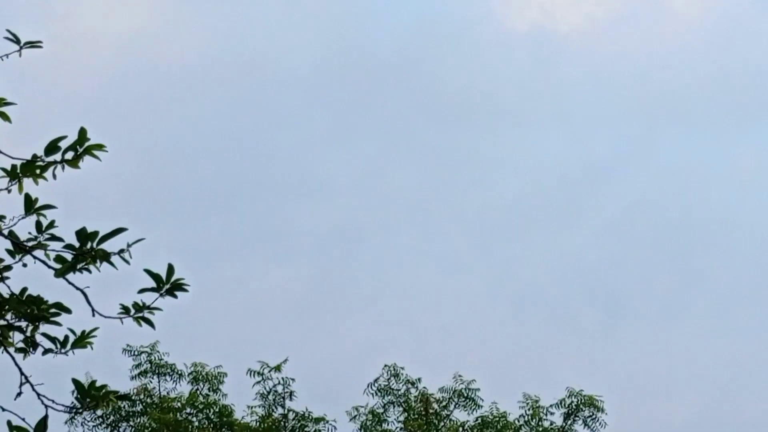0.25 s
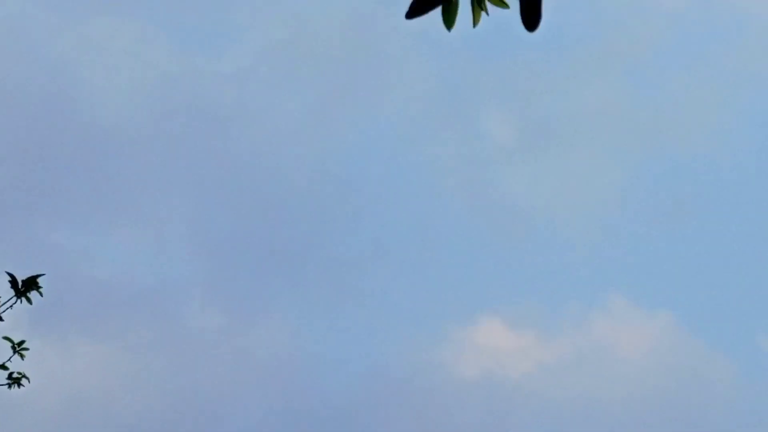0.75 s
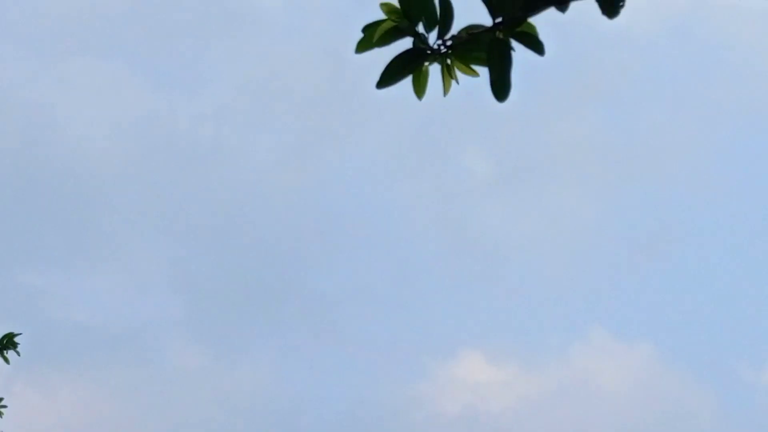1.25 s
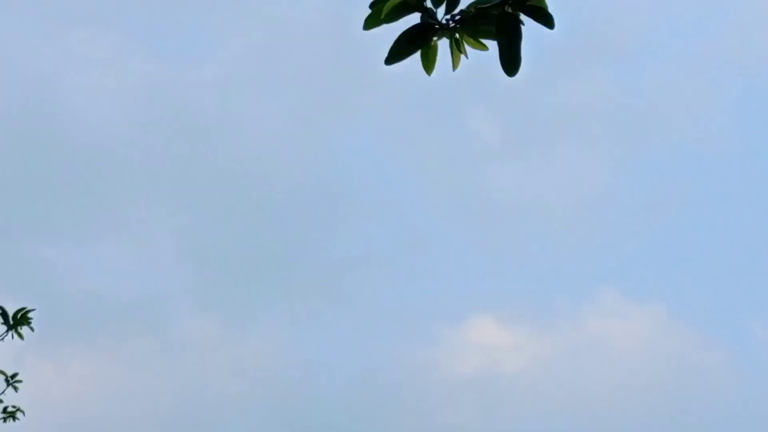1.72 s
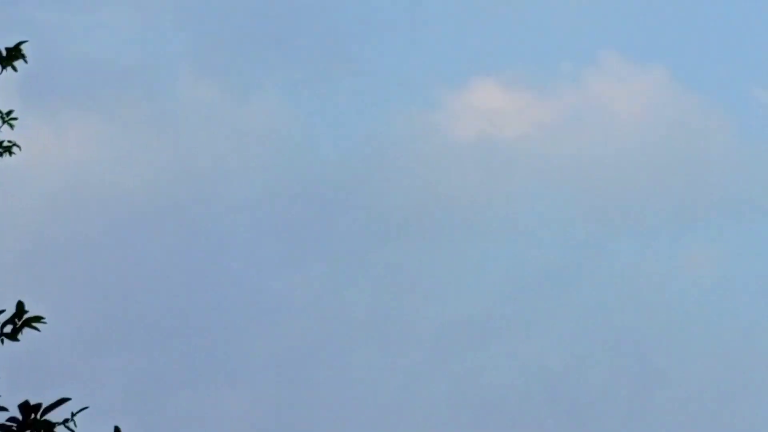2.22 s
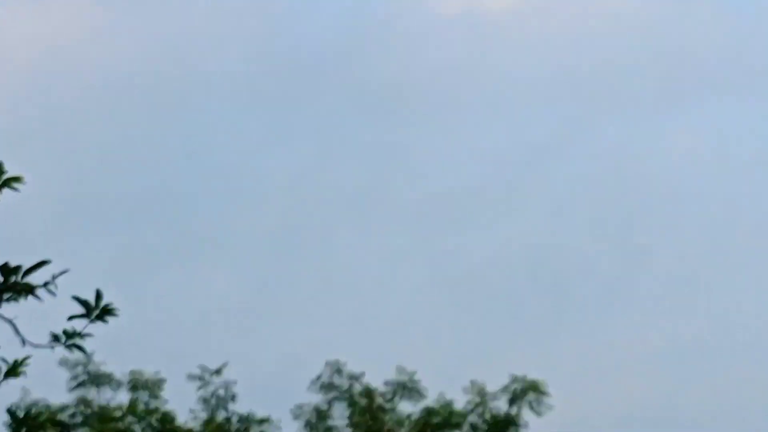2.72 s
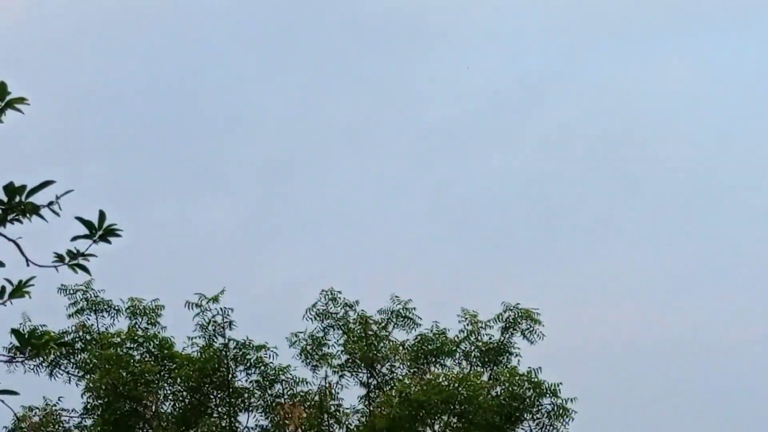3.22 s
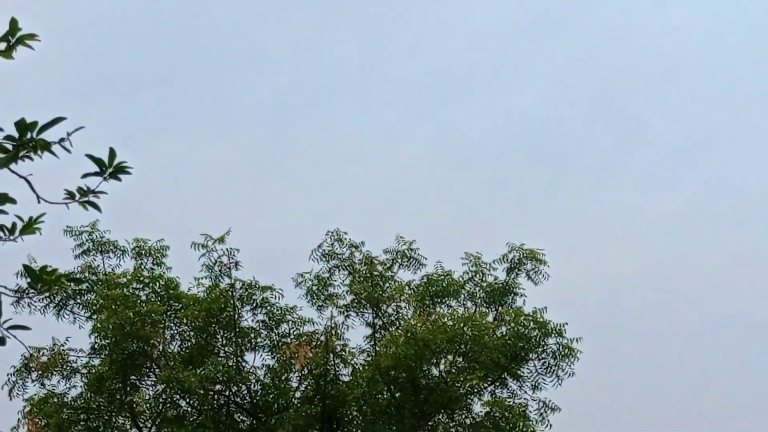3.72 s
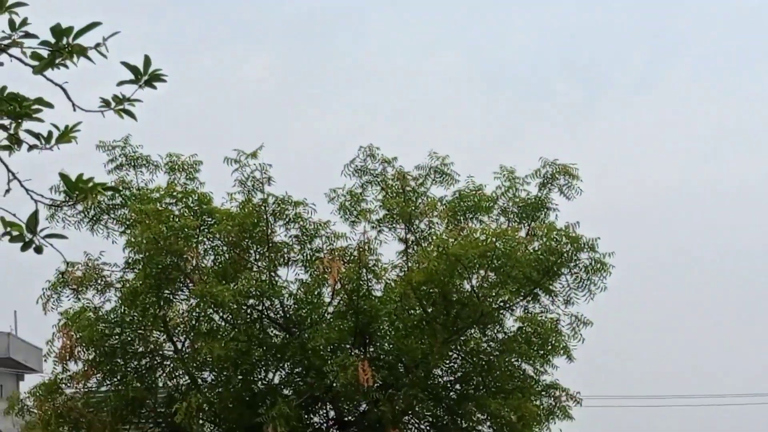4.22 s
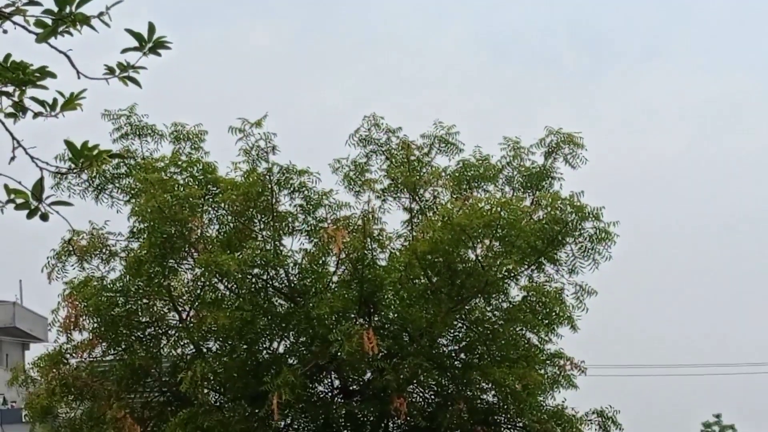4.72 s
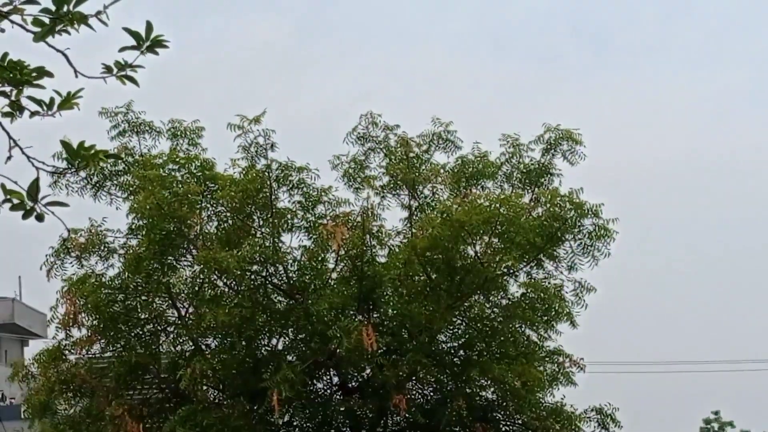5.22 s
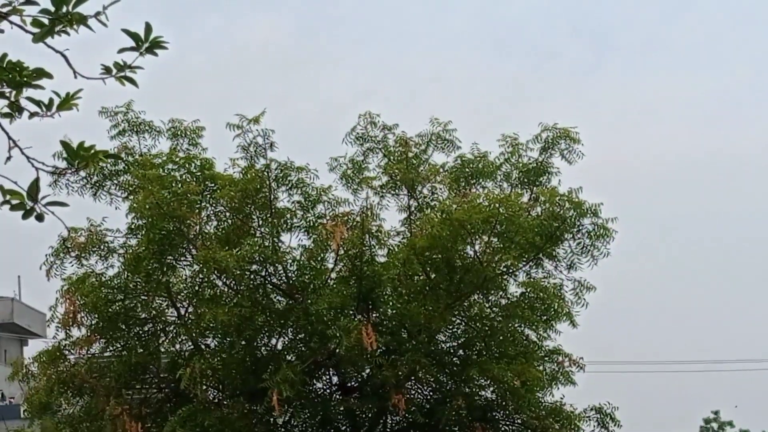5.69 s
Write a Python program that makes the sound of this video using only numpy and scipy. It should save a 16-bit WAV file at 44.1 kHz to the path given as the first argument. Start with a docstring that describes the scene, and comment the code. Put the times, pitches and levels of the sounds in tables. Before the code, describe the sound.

A koel gives four loud slurred rising whistles, each higher than the last, echoing among garden trees over faint town hum and distant birds.

```python
"""A koel in a garden tree gives four slurred whistles of one shape, each pitched higher than the last:
tones with weak overtones, a rasp near each crest (deepest in the third), a bright hiss after it, and
echoes off walls and trees. Throughout: noise-made town and air, two thin whines, far birds as sine slurs.
A dull bump early and one near the second call; a far engine surges once after it, then fades as a low
hum joins; soft noise rustles come before the third and fourth calls, with a small bird's trill before the last."""
import sys
import numpy as np
from scipy import signal
from scipy.fft import rfft, irfft, next_fast_len
from scipy.io import wavfile
from scipy.ndimage import uniform_filter1d, map_coordinates

SR = 44100
rng = np.random.default_rng(int(sys.argv[2]) if len(sys.argv) > 2 else 0)


def pcm_store(signal):
    """Save signal as 16-bit PCM."""
    levels = np.round(np.clip(np.atleast_2d(signal), -1, 1) * 32767)
    wavfile.write(sys.argv[1], SR, levels.astype(np.int16).T)


N = 262395
TIME = np.arange(N) / SR

# koel's calls, before the throat: start t/s, crest t/s, end t/s, base f/Hz, crest f/Hz,
# base level/dB, crest level/dB, overtones level/dB (before slope and effort)
WHISTLES = [(-.07, .334, .5, 1240, 1562, -46.5, -31.3, -10.5),
            (1.68, 2.04, 2.2, 1347, 1676, -38, -25, -10.5),
            (3.223, 3.573, 3.718, 1401, 1716, -36, -24, -8.5),
            (4.775, 5.076, 5.21, 1533, 1756, -29.5, -24.3, -9)]
# slower second vibration in each call: start t/s, end t/s, depth level/dB, rate/share of pitch
RASP = [(.26, .32, -28, .245), (1.955, 2.02, -24, .24), (3.425, 3.63, -16.5, .25), (4.915, 5.03, -22, .236)]
# response of throat and beak: f/Hz, level/dB
THROAT = [(800, -9.5), (1230, 5), (1780, -3), (2150, -3.5), (2600, -0.5), (3000, -17), (3450, -18.5),
          (3900, -30.5), (4350, -11.5), (5250, 3), (5550, -1), (6100, -8), (9500, -6), (12500, -26),
          (15300, -13.5)]
# hiss after each crest: f/Hz, relative density level/dB
HISS_COLOUR = [(3500, -30.5), (5000, -2.5), (6500, 4), (8300, -5.0), (10300, -3), (12000, -28.5),
               (15000, -31.5)]
# wall echoes, before the treble loss: delay t/s, level/dB
WALLS = [(0.013, -15), (0.028, -17.5), (0.046, -19.5), (0.066, -16), (.118, -35.5), (.18, -21.5)]
# decay of the trees' tail: f/Hz, t60/s
GARDEN_DECAY = [(300, 0.58), (1600, 1.67), (3000, 2.04), (5200, 1.32), (9000, .6), (15000, .2)]
# colour of that tail, relative: f/Hz, level/dB
GARDEN_COLOUR = [(500, 1.5), (1600, -2), (5000, -0.5), (9000, -0.5), (15000, -28)]
# small bird: t/s, level/dB, nominal f/Hz
TWITTERS = [(4.444, -51, 5750), (4.508, -64, 5750)]
# twitter contour: t/share of length, f/share of nominal
TWITTER_CONTOUR = [(0, 1.03), (.3, 1.02), (.62, .92), (.74, 1.15), (1, 1.14)]
# soft rustles: t/s, level/dB, fade t60/s
RUSTLES = [(3.041, -60.5, 0.38), (4.46, -53, 0.29), (4.509, -57, 0.83), (4.65, -71.5, 1)]
# noise spectrum of the rustles: f/Hz, relative density level/dB
RUSTLE_COLOUR = [(60, -12), (160, 9.5), (280, -21.5), (550, 1), (900, -4.5), (1800, 0), (2700, -5),
                 (4500, -29.5), (8000, -47.5)]
# dull bumps: t/s, level/dB, f/Hz
BUMPS = [(0.821, -67, 284), (2.16, -65.5, 271)]
# far birds' plain slurs: t/s, length/s, start f/Hz, end f/Hz, level/dB
SLURS = [(.9, .55, 3070, 2950, -81), (2.28, .31, 3100, 2970, -78.5), (2.582, 0.25, 2900, 2560, -76),
         (4.66, 0.1, 4060, 4150, -79), (5.71, .066, 6740, 5430, -73)]
# noise spectra of the town and the open air: f/Hz, relative density level/dB
RUMBLE_COLOUR = [(25, -46), (50, -17), (95, 6), (125, -2.5), (160, -3), (220, -8), (320, -7), (500, -15),
                 (900, -60.5)]
HUM_COLOUR = [(100, -22), (150, 1), (215, -11), (400, -22), (700, -50)]
MURMUR_COLOUR = [(200, -13), (330, -4.5), (460, -0.5), (580, 1), (750, -4), (1200, -8), (2000, -13.5),
                 (4000, -39)]
ENGINE_COLOUR = [(380, -25), (520, -1.5), (590, 3), (670, -6), (850, -17.5), (1300, -42.5)]
AIR_COLOUR = [(500, -8), (1300, 3.5), (2200, 0), (3100, -9), (3800, -8.5), (5000, -8), (6600, -15.5),
              (7600, -23), (10000, -35), (15000, -33)]

# whistle shape
SCOOP_SHARE, SCOOP_S = .36, .0085  # starts this share below its pitch, rises this quickly
OVERSHOOT_HZ, SETTLE_S = 330, .035  # before the scoop
CLIMB_LATE = 1.88  # exponent: higher = later climb
DROP_HZ_PER_S, CREST_ROUND_S = 5680, .045  # steady fall after a rounded crest
PLUNGE_HZ, PLUNGE_S = 243, .009  # extra fall as the air runs out
LOUD_EARLY = 0.77  # exponent: below 1, level climbs ahead of pitch
OVERSHOOT_DB_PER_HZ, DROP_DB_PER_HZ = 0.0075, 0.0437
# town
RUMBLE_DB, RUMBLE_DB_PER_S = -75.5, .5  # start level, slow growth
HUM_DB, HUM_ON_S, HUM_RISE_S = -73.5, 2.7, .7
MURMUR_DB, SWELL_S, SWELL_WIDTH_S, SWELL_DB = -70.5, 4.68, 0.21, 8  # a low rustling swell joins once, before the fourth call
ENGINE_DB, ENGINE_GONE_S, ENGINE_FADE_S = -68.5, 3.55, 1.0
SURGE_S, SURGE_WIDTH_S, SURGE_DB = 2.33, 0.11, 12  # engine surges once
# lower whine comes forward for a while
WHINE_ON_S, WHINE_OFF_S, WHINE_FADE_S = .72, 2.3, .15
WHINE_DB, WHINE_IDLE_DB = -72, -82.5
TOP_HZ = 15550


def amp(db):
    """Decibels to gain."""
    return 10 ** (np.asarray(db) / 20)


def unit(x):
    """Scale to rms 1."""
    return x / np.sqrt(np.mean(x ** 2) + 1e-20)


def along(points, hz):
    """Read (f/Hz, value) points on a log axis."""
    f, v = np.transpose(points)
    return np.interp(np.log(hz + 1), np.log(f), v)


def ramp(u):
    """Soft step from 0 to 1 as u goes from 0 to 1."""
    return np.sin(np.pi / 2 * np.clip(u, 0, 1)) ** 2


def turns(hz):
    """Running phase (rad) of a changing frequency."""
    return 2 * np.pi * np.cumsum(hz) / SR


def wobble(rate_hz, size=N):
    """Smooth random curve, rate_hz knots a second."""
    knots = rng.standard_normal(int(size * rate_hz / SR) + 4)
    return map_coordinates(knots, [np.arange(size) * rate_hz / SR])


def filtered(x, response):
    """Apply a response of frequency to x."""
    m = next_fast_len(N + 8192)
    return irfft(rfft(x, m) * response(np.fft.rfftfreq(m, 1 / SR)), m)[:N]


def noise(spectrum, patchy_db):
    """Coloured noise of rms 1 with time-frequency patches of random gain."""
    z = signal.stft(rng.standard_normal(N), nperseg=512)[2]
    field = uniform_filter1d(rng.standard_normal(z.shape), size=5, axis=0)
    field = uniform_filter1d(field, size=16, axis=1)
    patchy = signal.istft(z * amp(patchy_db * unit(field)), nperseg=512)[1][:N]
    return unit(filtered(patchy, lambda hz: amp(along(spectrum, hz))))


def add(track, start_s, sound):
    """Mix a sound into the track at start_s."""
    part = track[max(round(start_s * SR), 0):][:len(sound)]
    part += sound[:len(part)]


def koel(hiss_db=-63, hiss_after_s=0.084, hiss_width_s=0.029):
    """Four whistles shaped by throat and beak; a bright noise hiss follows each crest."""
    voice, hiss = np.zeros(N), np.zeros(N)
    for row, rasp in zip(WHISTLES, RASP):
        start, crest = row[:2]
        add(voice, start, whistle(row, rasp))
        hiss += np.exp(-((TIME - crest - hiss_after_s) / hiss_width_s) ** 2)
    voice = amp(0.98) * filtered(voice, lambda hz: amp(along(THROAT, hz)))
    return voice + amp(hiss_db) * hiss * noise(HISS_COLOUR, patchy_db=4)


def whistle(row, rasp, attack_s=0.027, release_s=0.022, slope_db_per_octave=-9.0,
            brightening=0.2, swing=0.88, buzz=0.32, overtone_bend=2.83, rasp_jitter_rad=0.034,
            fall_jitter_rad=0.024, clean_jitter_rad=0.0012, uneven_db=3):
    """One call: a nearly pure tone with weak overtones, roughened where the bird strains."""
    t = TIME[(TIME > row[0]) & (TIME < row[2])]
    size = len(t)
    *shape, overtone_db = row
    pitch, level_db = slur(t, *shape)
    start, end, depth_db, share = rasp
    strain = amp(depth_db) * ramp((t - start) / 0.032) * ramp((end - t) / 0.031)
    # membranes flutter when strained, and as they slacken in the final drop
    slack = ramp((1 - pitch / pitch.max()) / .2) * (t > t[np.argmax(pitch)])
    jitter = clean_jitter_rad + rasp_jitter_rad * strain + fall_jitter_rad * slack
    phase = turns(pitch) + jitter * wobble(2400, size=size)
    # slow vibration kicks timing and strength of the cycles: sidebands, mostly above the tone
    slow = np.exp(1j * turns(share * pitch))
    kick = strain * slow / (1 - np.clip(buzz, 0, .8) * slow)
    wave = np.sin(phase + kick.imag)
    # overtones follow the moment of closure, kicked further and less evenly
    closure = phase + overtone_bend * kick.imag
    closure = closure + .4 * strain * wobble(1500, size=size)
    # they grow with effort; each wavers by itself
    effort_db = brightening * (level_db + 22)
    for k in np.arange(2, 11):
        db = overtone_db + effort_db + slope_db_per_octave * np.log2(k)
        db = db + uneven_db * wobble(36.8, size=size)
        wave = wave + amp(db) * np.sin(k * closure)
    envelope = ramp((t - row[0]) / attack_s) * ramp((t[-1] - t) / release_s)
    return np.sqrt(2) * amp(level_db) * (1 + swing * kick.real) * wave * envelope


def slur(t, start, crest, end, base_hz, crest_hz, base_db, crest_db):
    """Pitch and level of a whistle: scoops up, settles, climbs to a crest, drops away."""
    age = t - start
    overshoot = OVERSHOOT_HZ * np.exp(-age / SETTLE_S)
    climb = ramp((age / (crest - start)) ** CLIMB_LATE)
    drop = DROP_HZ_PER_S * (np.hypot(np.maximum(t - crest, 0), CREST_ROUND_S) - CREST_ROUND_S)
    drop = drop + PLUNGE_HZ * np.exp((t - end) / PLUNGE_S)
    pitch = base_hz + overshoot + (crest_hz - base_hz) * climb - drop
    pitch = pitch * (1 - SCOOP_SHARE * np.exp(-age / SCOOP_S))
    level_db = base_db + (crest_db - base_db) * climb ** LOUD_EARLY
    level_db = level_db + OVERSHOOT_DB_PER_HZ * overshoot - DROP_DB_PER_HZ * drop
    return pitch, level_db


def garden(x, tail_db=-12.5, near_db=-23, near_t60_s=0.1, leaf_db=9.5, wall_hz=3500):
    """Dull wall echoes, quick bright scatter from near leaves, long tail from the trees."""
    hz, t, z = signal.stft(rng.standard_normal(2 * SR), SR, nperseg=256)
    decay_db = 60 * t / along(GARDEN_DECAY, hz)[:, None]
    tail = amp(along(GARDEN_COLOUR, hz)[:, None] - decay_db) * ramp(t / 0.029)
    # tail and scatter each have unit energy near the whistle's pitch
    tail = tail / np.sqrt(np.sum(tail[np.searchsorted(hz, 1600)] ** 2) * t[1] * SR)
    near = amp(-60 * t / near_t60_s) * ramp(t / 0.02)
    near = near / np.sqrt(np.sum(near ** 2) * t[1] * SR)
    near = near * amp(along([(1600, 0.011), (6000, leaf_db)], hz))[:, None]
    gain = np.hypot(amp(tail_db) * tail, amp(near_db) * near)
    answer = signal.istft(z * gain, SR, nperseg=256)[1]

    def walls(f):
        """Delayed copies with treble loss."""
        echoes = sum(amp(db) * np.exp(-2j * np.pi * f * delay) for delay, db in WALLS)
        return echoes / np.hypot(1, f / wall_hz)

    return signal.fftconvolve(x, answer)[:N] + filtered(x, walls)


def twitterer():
    """One small bird close by: twitters at set times."""
    song = np.zeros(N)
    for start, db, hz in TWITTERS:
        add(song, start, amp(db) * twitter(hz))
    return song


def twitter(pitch_hz, trill_hz=175, trill_share=.085, length_s=0.041):
    """A sine in a fast sinking trill that flicks up to a held high note."""
    u = np.arange(int(length_s * SR)) / (length_s * SR)
    centre = np.interp(u, *np.transpose(TWITTER_CONTOUR))
    trill = trill_share * np.cos(2 * np.pi * trill_hz * length_s * (u - .09)) * ramp((.72 - u) / .3)
    tone = np.sqrt(2) * np.sin(turns(pitch_hz * (centre + trill)))
    return tone * ramp(u / .4) * ramp((1 - u) / .25)


def rustles():
    """Short soft brushing sounds: noise that swells quickly and decays exponentially."""
    swell = np.zeros(N)
    for start, db, t60 in RUSTLES:
        age = TIME - start
        swell += amp(db - 60 * np.maximum(age, 0) / t60) * ramp(age / 0.012)
    return swell * noise(RUSTLE_COLOUR, patchy_db=2.5)


def bumps(length_s=0.075, wander_hz=45):
    """Soft, dull bumps: short low tones spread by random pitch wander."""
    low, size = np.zeros(N), int(length_s * SR)
    for start, db, hz in BUMPS:
        tone = np.sin(turns(hz + wander_hz * wobble(121, size=size)))
        add(low, start, amp(db) * unit(tone * np.hanning(size)))
    return low


def far_birds(far_db=-83, spread_db=2, count=200):
    """Scattered twitters and wavering sine slurs from other gardens."""
    song = np.zeros(N)
    for when, high, loud, long in rng.random((count, 4)):
        call = twitter(4300 + 1600 * high, length_s=0.039 + 0.028 * long)
        add(song, when * N / SR, amp(far_db + spread_db * (2 * loud - 1.5)) * call)
    for start, length, start_hz, end_hz, db in SLURS:
        size = int(length * SR)
        pitch = np.linspace(start_hz, end_hz, size) + 45 * wobble(240, size=size)
        add(song, start, amp(db) * unit(np.sin(turns(pitch)) * np.hanning(size)))
    return song


def from_afar(x, t60_s=0.42):
    """Far sounds arrive only as decaying scatter, with no direct path."""
    t = np.arange(SR // 2) / SR
    scatter = rng.standard_normal(len(t)) * amp(-60 * t / t60_s)
    return signal.fftconvolve(x, scatter / np.linalg.norm(scatter))[:N]


def background(high_whine_db=-75.0, air_db=-71.5):
    """Town, two thin sine whines of wavering pitch, and the noise hiss of open air."""
    forward = ramp((TIME - WHINE_ON_S) / WHINE_FADE_S) * ramp((WHINE_OFF_S - TIME) / WHINE_FADE_S)
    low_db = WHINE_IDLE_DB + (WHINE_DB - WHINE_IDLE_DB) * forward
    low_whine = amp(low_db) * unit(np.sin(turns(964 + 5 * wobble(34))))
    high_whine = amp(high_whine_db) * unit(np.sin(turns(1730 + 18 * wobble(80))))
    air = amp(air_db + 0.54 * wobble(7.4)) * noise(AIR_COLOUR, patchy_db=3.0)
    return town() + low_whine + high_whine + air


def town():
    """Noise bands: rumble, hum and murmur of traffic, one low rustling swell, and the drone of one far engine."""
    rumble = amp(RUMBLE_DB + RUMBLE_DB_PER_S * TIME) * noise(RUMBLE_COLOUR, patchy_db=2.5)
    hum = amp(HUM_DB) * ramp((TIME - HUM_ON_S) / HUM_RISE_S) * noise(HUM_COLOUR, patchy_db=3.5)
    swell = np.exp(-((TIME - SWELL_S) / SWELL_WIDTH_S) ** 2)
    murmur = amp(MURMUR_DB + SWELL_DB * swell) * noise(MURMUR_COLOUR, patchy_db=3.5)
    surge = np.exp(-abs(TIME - SURGE_S) / SURGE_WIDTH_S)
    engine = amp(ENGINE_DB + SURGE_DB * surge) * ramp((ENGINE_GONE_S - TIME) / ENGINE_FADE_S)
    return rumble + hum + murmur + engine * noise(ENGINE_COLOUR, patchy_db=2.0)


def scene():
    """Near birds and their echoes over far birds, rustles, bumps and background."""
    birds = koel() + twitterer()
    near = birds + garden(birds)
    return (near + from_afar(far_birds()) + rustles() + bumps() + background())[None]


def record(dry):
    """Sharp low-pass: nothing passes at or above TOP_HZ."""
    return filtered(dry[0], lambda hz: hz < TOP_HZ)[None]


dry = scene()
out = record(dry)
pcm_store(out)
```